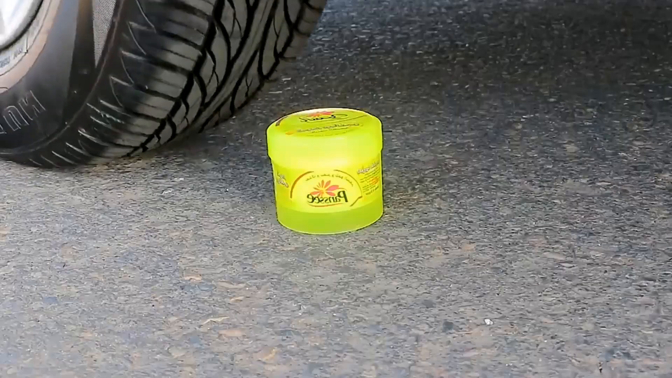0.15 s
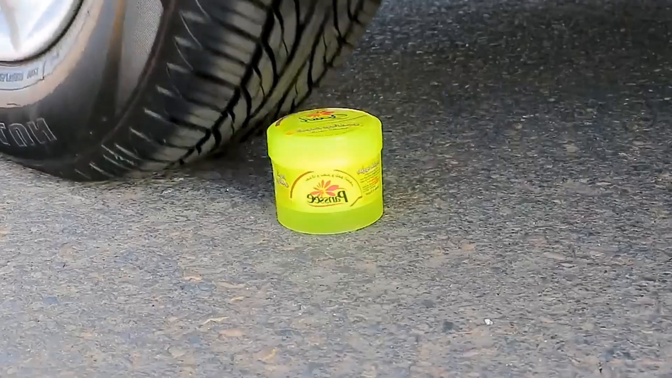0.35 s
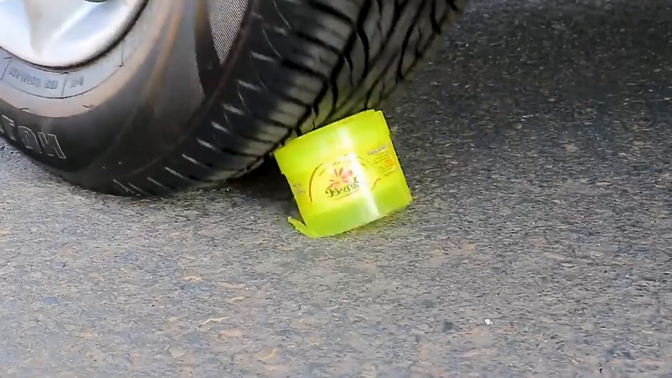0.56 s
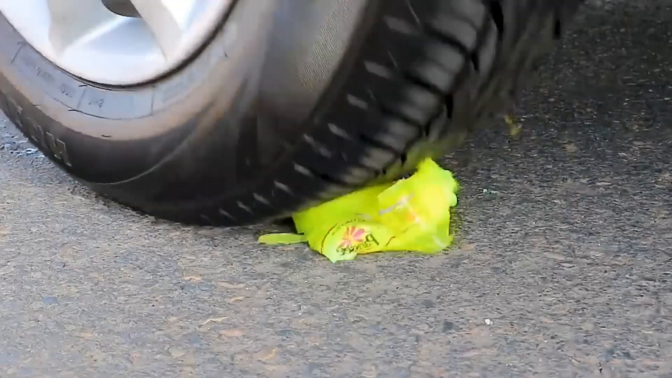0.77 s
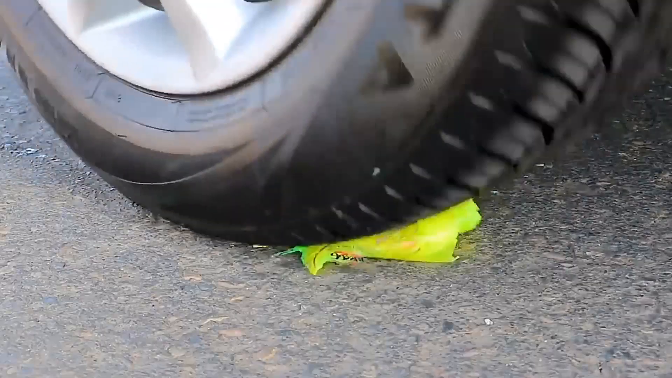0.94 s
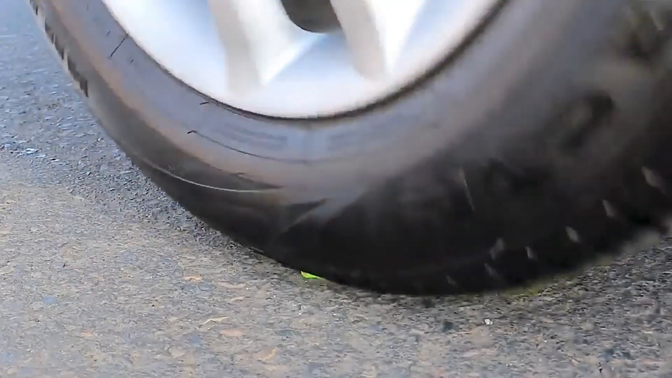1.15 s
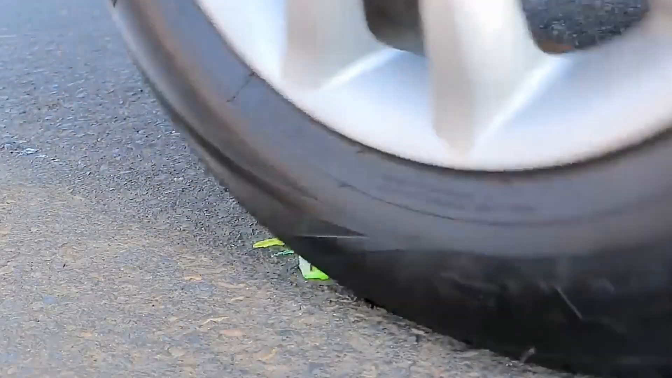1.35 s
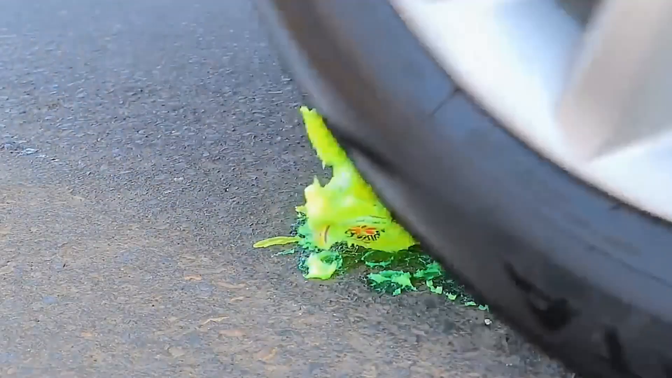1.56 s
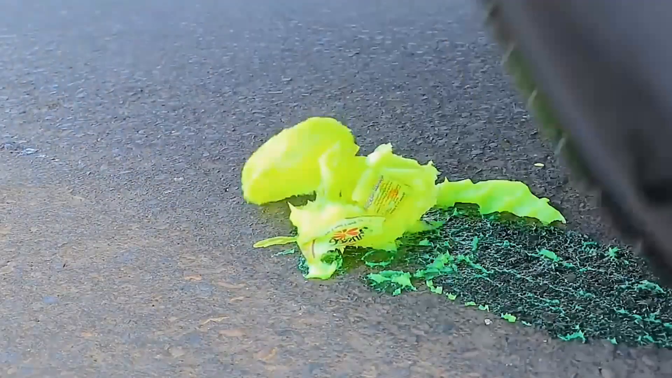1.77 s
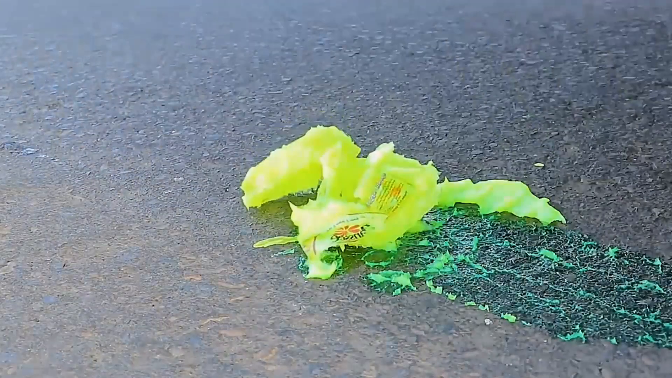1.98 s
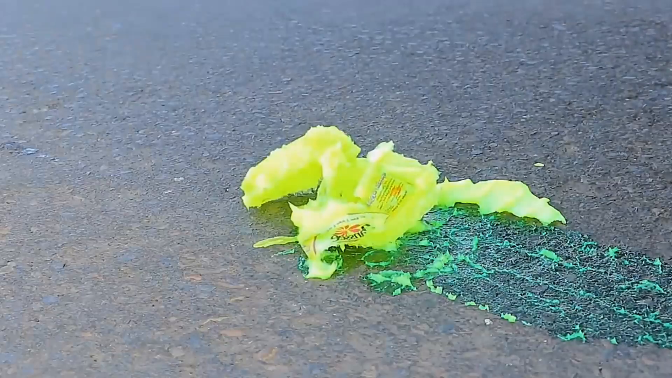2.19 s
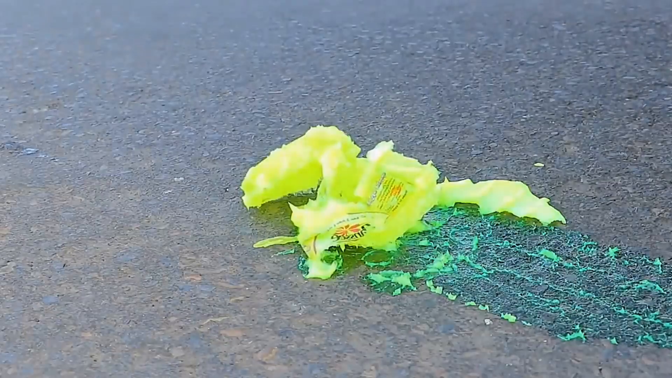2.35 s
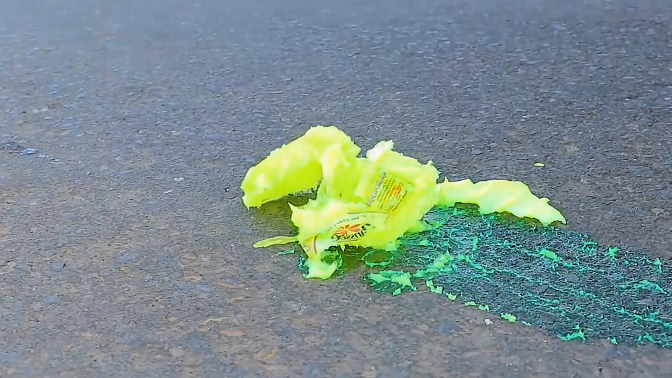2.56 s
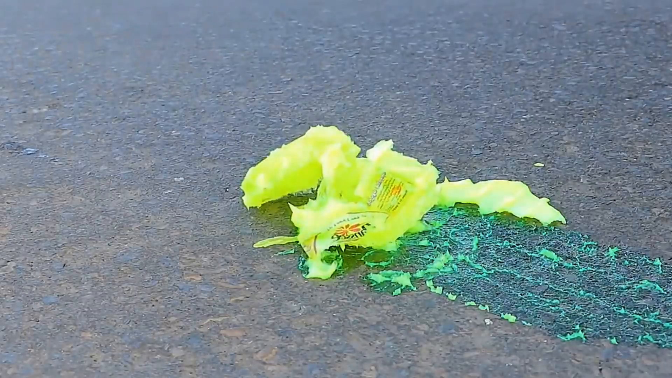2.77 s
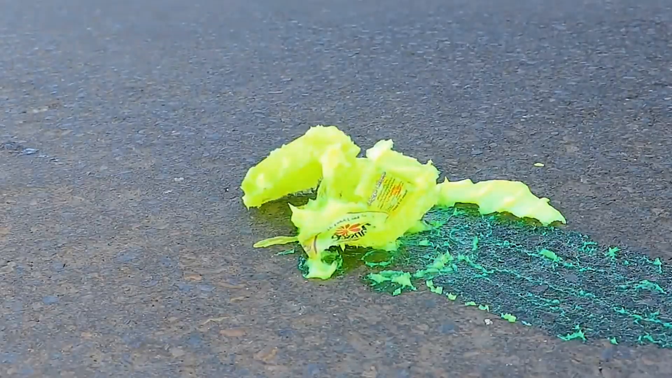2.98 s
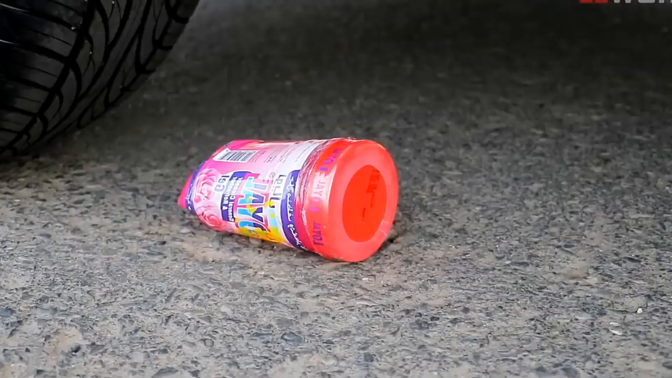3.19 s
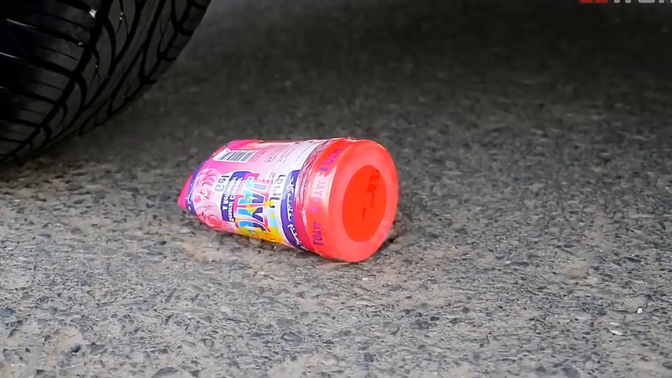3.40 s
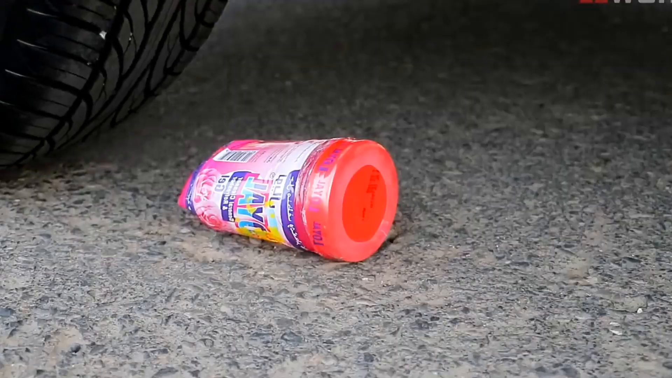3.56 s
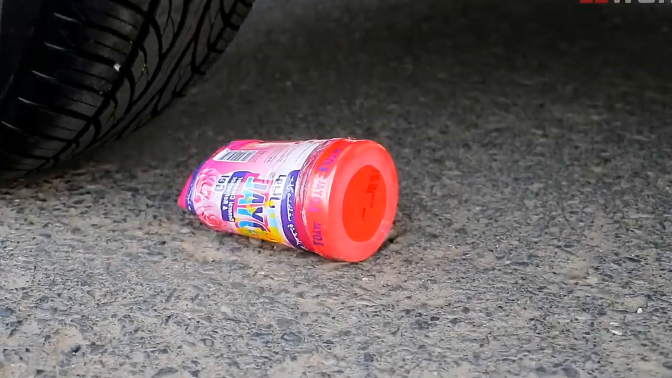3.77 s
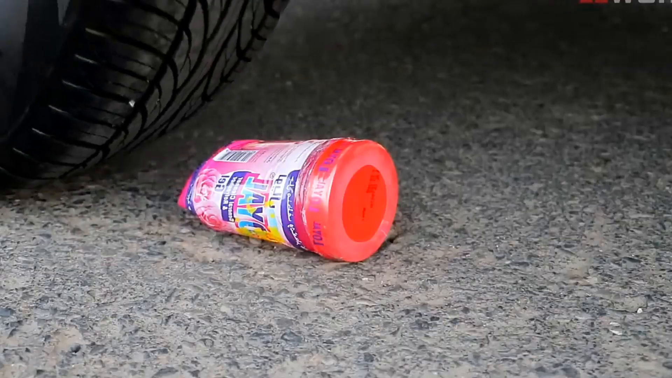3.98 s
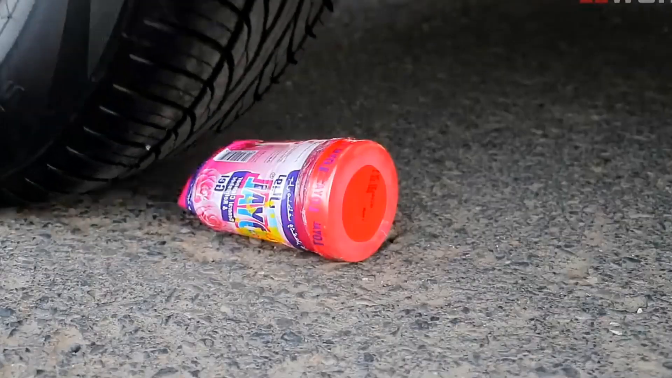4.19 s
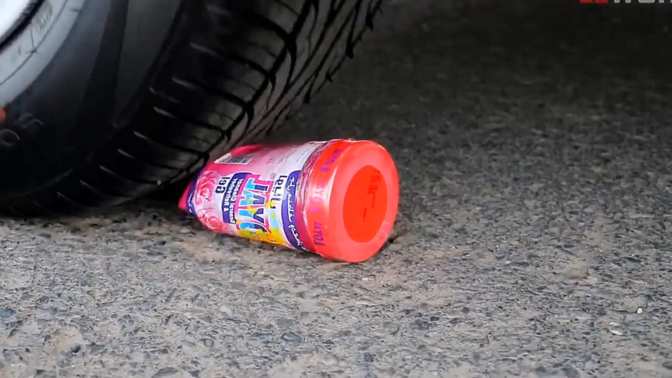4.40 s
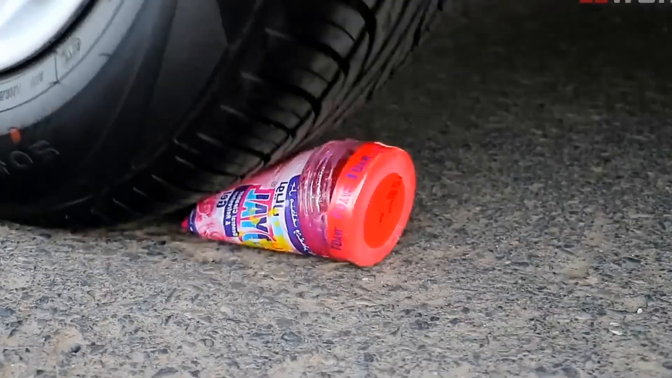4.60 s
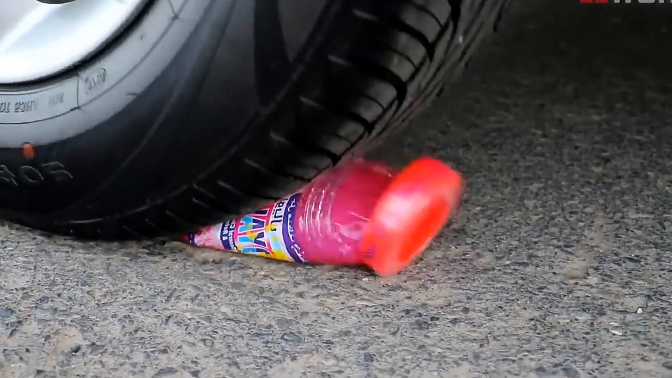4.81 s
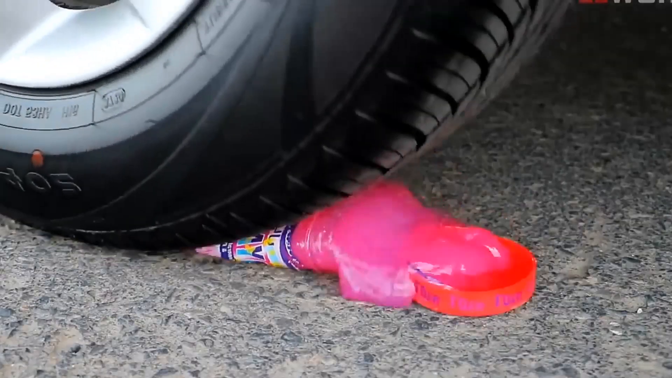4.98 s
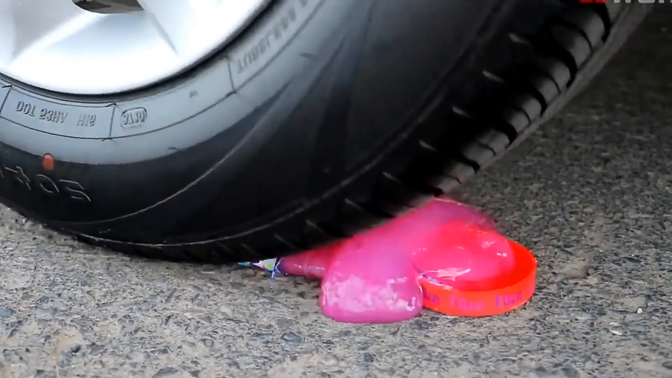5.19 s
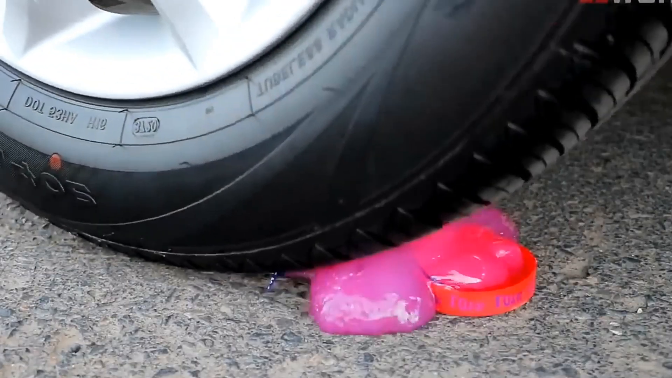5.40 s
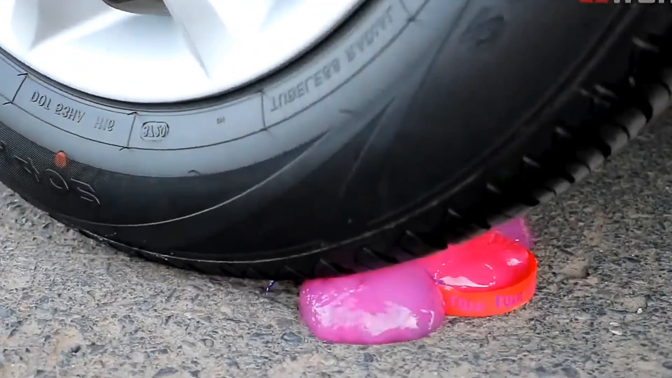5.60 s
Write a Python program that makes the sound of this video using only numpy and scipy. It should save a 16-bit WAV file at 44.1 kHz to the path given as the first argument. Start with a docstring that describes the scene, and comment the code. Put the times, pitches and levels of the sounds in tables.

```python
"""A tyre crushing a jar and a bottle

A car tyre creeps over a brittle plastic jar, then over a soft plastic bottle on asphalt. The jar
fractures in volleys of cracks that overload the microphone; the bottle buckles in small snaps.
Each is an impulse that excites damped resonances. Slime and splinters crackle under the tread,
while the exhaust pulses at idle, the engine rattles, the street hums and wind rumbles."""
import sys
import numpy as np
from scipy import signal
from scipy.fft import rfft, irfft
from scipy.io import wavfile

SR = 44100
rng = np.random.default_rng(int(sys.argv[2]) if len(sys.argv) > 2 else 0)


def output_pcm(signal):
    """Save a mono or channel-first signal as 16-bit PCM at the path in sys.argv[1].

    Samples are clipped to [-1, 1] before scaling.
    """
    pcm = np.clip(np.atleast_2d(signal).T, -1, 1) * 32767
    wavfile.write(sys.argv[1], SR, np.round(pcm).astype(np.int16))


N = 249165

# Jar fractures, bottle snaps, and ticks from the car between the two:
# t/s, peak level/dB, ring f/Hz, t60/s, treble re peak/dB
JAR_CRACKS = [(0.5234, -13.5, 4100, .007, -19), (0.6088, -20, 995, 0.0054, -23.5),
              (0.6144, 7.5, 766, .024, -3.5), (0.6273, 15, 5550, .025, -0.5), (0.632, 4, 5000, .047, -10),
              (0.6917, -10, 4330, .006, -1.5), (0.6949, 1.5, 4170, .02, -30.5),
              (0.7105, 7.5, 4830, .063, -10), (0.7219, 4.5, 1460, .02, 3), (0.7262, -6.5, 1500, .024, -8),
              (0.7345, 1, 3430, .024, -15), (0.7544, -15, 3524, .034, -1.5),
              (0.7728, -2.5, 1320, .013, -8.5), (0.7915, -0.5, 1500, .012, -3),
              (0.7956, 9, 3345, .008, -29.5), (0.8041, -2.5, 900, .04, -5), (0.8085, 9, 4750, .032, -6.5),
              (0.8344, -6.5, 1865, .007, -8), (0.8586, -5, 1120, .007, -16.5),
              (0.8647, -4, 1120, .019, -0.5), (0.8707, -3.5, 1900, .028, -9), (0.876, 4, 2340, .02, -7.5),
              (0.885, -2.5, 983, .026, -6), (0.8963, -3, 1140, .01, -20),
              (0.9137, -12.5, 2720, .0035, -6.5), (0.9389, -11.5, 2640, .017, 3.5),
              (0.9512, 4, 1050, .007, 0.5), (0.9621, 7.5, 1460, .009, -4), (0.9725, 2.5, 2000, .018, 2),
              (1.0254, -20.5, 3380, .007, -10), (1.0679, -21, 2430, .003, -8),
              (1.1105, -22, 4400, .003, -13), (1.1215, -21, 7000, .002, -6), (1.1296, -0.5, 3120, .006, -4),
              (1.1435, -26, 1000, .015, -14), (1.2083, -21, 1080, .013, -33),
              (1.2202, 4, 1750, 0.0062, -0.5), (1.2412, -28, 2300, .03, -13), (1.2845, -9, 3200, .006, -7),
              (1.2992, -15.5, 3170, .0046, -9), (1.3068, -17, 1000, .027, -24),
              (1.3871, -14, 3240, .002, -13), (1.4059, -23.5, 1870, .009, -29),
              (1.4204, -27, 1880, .012, -28), (1.4341, -18, 1680, .013, -34),
              (1.4674, -24, 2300, .034, -20), (1.4818, -12.5, 720, .034, -35),
              (1.5179, -16, 1610, .003, -25), (1.5224, -28, 2370, .016, -20),
              (1.5685, -42.5, 8100, 0.0055, -4), (1.5908, -34, 2690, .014, -9)]
BOTTLE_SNAPS = [(4.4631, -24, 4860, 0.0097, -18), (4.4847, -22, 3700, 0.0073, 3),
                (4.4963, -22, 3020, 0.0033, -12), (4.5234, -17.5, 4930, .011, -12),
                (4.5347, -17.5, 690, 0.024, -9), (4.5633, -12.5, 5000, .008, -34),
                (4.573, -5.5, 1080, 0.02, -3.5), (4.5771, -15.5, 2080, 0.036, -1.5),
                (4.6035, -25, 1080, .017, -10), (4.6171, -14.5, 5150, 0.015, -8),
                (4.6385, -18.5, 2330, 0.012, -7), (4.6701, -16, 3440, 0.0054, -30),
                (4.736, -18, 3700, 0.0084, -8), (4.771, -14.5, 3680, 0.0067, -14),
                (4.8028, -13, 5540, 0.0031, -4), (4.8177, -22, 2910, 0.021, -22),
                (4.8352, -23, 7500, 0.0073, 4), (4.8479, -27, 3670, 0.0033, 9.5),
                (4.8735, -26, 990, 0.015, 1), (4.9048, -25, 3700, 0.0062, 4), (4.9326, -13, 4930, 0.015, 6),
                (4.9566, -40, 3900, .006, -9), (4.9753, -10, 4500, .005, -12),
                (4.9857, -15, 4820, .006, -17), (4.9991, 1.5, 1690, 0.005, -36),
                (5.0029, -12, 1760, 0.014, -24), (5.029, -17, 1080, 0.014, -8),
                (5.0455, -25, 4500, .017, -6), (5.0502, -11, 4600, .018, -3),
                (5.0845, -15, 2650, 0.016, -5), (5.0882, -6.5, 4730, 0.0046, -14),
                (5.12, -20.5, 940, .007, -23), (5.136, -23.5, 3760, 0.12, -25),
                (5.1719, -19, 2370, .027, -3), (5.1976, -25, 2130, .01, -18),
                (5.2109, -12, 4240, 0.005, -13), (5.2177, -18.5, 2280, 0.0093, -12),
                (5.2355, -16.5, 4800, 0.031, -15), (5.2535, -15.5, 1250, 0.011, -2),
                (5.2658, -19.5, 1290, .0034, -2), (5.2819, -19.5, 5000, 0.0044, -15),
                (5.3066, -30, 2430, .012, -20), (5.323, -13.5, 720, 0.0086, -24),
                (5.3265, -16.5, 820, 0.033, -17), (5.3811, -17.5, 1940, .012, -14),
                (5.416, -26, 4130, .009, -6), (5.4632, -6, 774, 0.016, -31), (5.5025, -25, 975, .043, -10),
                (5.5766, -30, 1210, 0.0095, -12)]
CAR_TICKS = [(2.423, -38.5, 1760, 0.19, -45), (3.12, -50.5, 6320, .12, -25.5),
             (3.198, -32, 2350, .014, -16)]
# Resonances of the two containers and the exhaust pipe: f/Hz, bandwidth/Hz, gain/dB
JAR_BODY = [(592, 200, 5), (920, 330, 6), (1260, 1700, -2)]
BOTTLE_BODY = [(720, 114, 19), (1080, 230, 13.5), (1880, 850, 9)]
PIPE_MODES = [(22.1, 15, -1.5), (64, 27, -4.5), (104, 40, -8), (292, 110, -7)]
# Exhaust at idle: t/s, firing rate/Hz, level/dB
IDLE = [(0, 20.5, -59.5), (0.5, 21, -63.5), (1.42, 20.8, -58.5), (2.02, 22.8, -53.5), (2.64, 21.3, -53),
        (2.97, 18.2, -57.5), (3.15, 22.5, -62.5), (5.65, 21, -60)]
# Street and engine bay: t/s, hum level/dB, rattle level/dB
BACKGROUND_LEVELS = [(0, -58, -61), (0.5, -51, -60), (1.0, -43, -54), (1.3, -46.5, -47),
                     (1.55, -51.5, -46.5), (1.75, -51, -60), (2.2, -55.5, -62.5), (2.6, -56.5, -61),
                     (2.95, -58, -67.5), (3.15, -64.5, -66), (3.3, -49.5, -55.5), (3.45, -49.5, -56.5),
                     (4.3, -51, -58), (4.6, -50, -61), (5.3, -50, -45.5), (5.65, -49, -57.5)]
# Spectra of the hum and the rattle: f/Hz, relative spectral level/dB
HUM_SPECTRUM = [(65, -33), (110, 2), (199, -8), (312, -1), (361, -6), (423, -2.5), (730, -2), (2000, -14.5),
                (2600, -43.5), (4400, -120)]
RATTLE_SPECTRUM = [(710, -31.5), (1200, -1), (1910, -12.5), (2180, 0.5), (2760, -7.5), (3590, -7.5),
                   (9410, -25.5), (10800, -36), (14800, -32.5), (16000, -52.5)]
# Tones in the engine rattle: f/Hz, bandwidth/Hz, level re rattle/dB
WHINE_TONES = [(1020, 150, -3), (1570, 40, -21), (2130, 35, -11)]
# Splinters and slime under the tread, one curve per container: t/s, level/dB
CRACKLE_LEVELS = [
    [(0.6, -46), (0.63, -38), (0.68, -43), (0.75, -28), (1.0, -60), (1.15, -55), (1.25, -57), (1.35, -71),
     (1.5, -68), (1.69, -52), (1.72, -70)],
    [(4.44, -60.5), (4.5, -46.5), (4.6, -41.5), (4.9, -43), (5.05, -38.5), (5.12, -48), (5.28, -45.5),
     (5.4, -53), (5.65, -61)],
]
# Walls giving way under the load: t/s, peak level/dB, f/Hz, t60/s
COLLAPSES = [(0.616, -31.5, 89, 0.52), (0.628, -20, 192, 0.38), (0.692, -11, 180, 0.33),
             (0.715, -29, 90, 0.23), (0.772, -13.5, 166.9, 0.12), (0.806, -19, 176.7, 0.11),
             (0.861, -23, 114.5, 0.2), (0.973, -7.5, 365, 0.088), (0.977, -29.5, 144, 0.37),
             (1.219, -26.5, 128, 0.23), (1.221, -18, 420, 0.05), (1.305, -34, 146, 0.11),
             (4.534, -21, 174, 0.073), (4.572, -20.5, 244, 0.14), (5.323, -33, 266, 0.095)]
# Air in the tyre, set humming by the shocks: t/s, f/Hz, level/dB
CAVITY_TONE = [(0.82, 197.4, -68.5), (0.88, 212, -43), (1.0, 199.5, -42.5), (1.15, 199.5, -50),
               (1.22, 203, -59)]
# Faint hiss as the car draws away: t/s, centre f/Hz, level/dB
HISS_GLIDE = [(2.42, 3900, -78), (2.55, 4150, -69), (2.9, 4700, -72), (3.0, 4750, -85)]
# Gusts on the microphone: t/s, level/dB
GUST_LEVELS = [(3.15, -72), (3.3, -56), (3.8, -56), (4.1, -62.5), (4.45, -48.5), (5.0, -58), (5.65, -45.5)]

# Coupling of a crack to body and mids, re its peak: body level at 2 kHz and t60 = 15 ms/dB,
# change per octave/dB, change per doubling of t60/dB, mids level/dB, mids dB per treble dB
JAR_COUPLING = (-7.5, -3.5, 2.5, -1.5, 0.4)
BOTTLE_COUPLING = (-11.5, -3.5, 0, -3, 0.54)
TICK_COUPLING = (-22, -10.5, 5, -12, 6)


def from_db(db):
    """Amplitude ratio of a level."""
    return 10 ** (np.asarray(db) / 20)


def unit_rms(x):
    """The signal scaled to an rms of 1."""
    return x / np.sqrt(np.mean(x ** 2) + 1e-20)


def in_time(rows):
    """Columns of a curve interpolated at every sample; -120 outside its span."""
    times, *columns = np.transpose(rows)
    return [np.interp(np.arange(N) / SR, times, c, left=-120, right=-120) for c in columns]


def butter(x, hz, kind, order=2):
    """Butterworth filter."""
    return signal.sosfilt(signal.butter(order, hz, kind, fs=SR, output="sos"), x)


def drift(hz):
    """Slow random fluctuation: low-passed noise of rms 1."""
    r = np.exp(-2 * np.pi * hz / SR)
    return unit_rms(signal.lfilter([1], [1, -2 * r, r * r], rng.standard_normal(N + SR))[SR:])


def resonate(x, hz, *widths_hz):
    """Damped resonators in series, one per bandwidth, each of unit peak gain."""
    for width in widths_hz:
        r = np.exp(-np.pi * width / SR)
        feedback = [1, -2 * r * np.cos(2 * np.pi * hz / SR), r * r]
        x = signal.lfilter(np.array([1, 0, -1]) * (1 - r * r) / 2, feedback, x)
    return x


def glide(hz):
    """A sine whose phase is the integral of its frequency."""
    return np.sin(2 * np.pi * np.cumsum(np.maximum(hz, 0)) / SR)


def coloured(spectrum, waver_db):
    """Spectrally shaped noise of rms 1 with a wavering level."""
    bins_hz = np.maximum(np.arange(N // 2 + 1) * SR / N, 1)
    hz, db = np.transpose(spectrum)
    shape = from_db(np.interp(np.log(bins_hz), np.log(hz), db))
    noise = irfft(rfft(rng.standard_normal(N)) * shape, N)
    return unit_rms(noise * from_db(waver_db * drift(15)))


def exhaust():
    """Pipe resonance, driven by a suction pulse per firing and a weaker pressure pulse in between."""
    firing_hz, level_db = in_time(IDLE)
    half_cycles = np.floor(2 * np.cumsum(np.maximum(firing_hz, 0)) / SR + 0.6)
    pulses = np.diff(half_cycles, prepend=0) * np.where(half_cycles % 2, .65, -1)
    puffs = butter(pulses * from_db(1.2 * rng.standard_normal(N)), 240, "low")
    pipe = sum(from_db(db) * resonate(puffs, hz, width) for hz, width, db in PIPE_MODES)
    return from_db(level_db) * unit_rms(pipe + 0.37 * puffs)


def street_hum():
    """Broadband noise with its energy mostly at low frequencies."""
    hum_db, _ = in_time(BACKGROUND_LEVELS)
    return from_db(hum_db) * coloured(HUM_SPECTRUM, waver_db=1.2)


def engine_rattle():
    """Bright broadband noise, with narrow noise-driven resonances heard as a whine."""
    _, rattle_db = in_time(BACKGROUND_LEVELS)
    white = rng.standard_normal(N)
    whine = sum(from_db(db + 2.5 * drift(3)) * unit_rms(resonate(white, hz, width, width))
                for hz, width, db in WHINE_TONES)
    return from_db(rattle_db) * (coloured(RATTLE_SPECTRUM, waver_db=1.0) + whine)


def cracks(events, body_modes, coupling):
    """Impulse excitation: a fracture or snap, a decaying noise, rings the piece and the whole body."""
    base_db, db_per_octave, db_per_doubling, mids_db, mids_follow = coupling
    out, size = np.zeros(N), SR // 6
    t = np.arange(size) / SR
    for start, peak_db, hz, t60, treble_db in events:
        decay = from_db(-60 * t / t60)
        burst = rng.standard_normal(size) * decay + 1e-18
        burst[0] += 3.5  # the first snap is the sharpest
        piece = resonate(burst, hz, 0.33 * hz, 2.0 * hz)
        # Each crack weights the modes differently; neighbouring modes alternate in sign.
        modes = sum(from_db(db + rng.normal(0, 2)) * (-1) ** k * resonate(burst, mode_hz, width)
                    for k, (mode_hz, width, db) in enumerate(body_modes))
        body = butter(modes, 1900, "low")
        # Large, low-pitched pieces and long fractures move the body more.
        body_db = base_db + db_per_octave * np.log2(hz / 2000) + db_per_doubling * np.log2(t60 / .015)
        treble = butter(burst * decay ** 1.1, [5500, 15000], "band", order=1)
        mids = butter(burst, [1500, 5000], "band", order=3)
        parts = [(piece, 0), (body, body_db), (treble, treble_db),
                 (mids, mids_db + mids_follow * treble_db)]
        sound = sum(from_db(db) * part / np.abs(part).max() for part, db in parts)
        at = round(start * SR)
        out[at:at + size] += from_db(peak_db) * sound[:N - at]
    return out


def scatter(x, level_db=-18, t60=.1):
    """Multiple reflection between road and car floor adds a short diffuse tail."""
    t = np.arange(SR // 4) / SR
    tail = butter(rng.standard_normal(len(t)), [700, 5000], "band", order=1) * from_db(-60 * t / t60)
    return from_db(level_db) * signal.fftconvolve(x, tail / np.sqrt(np.sum(tail ** 2)))[:N]


def crackle(level_db, median_per_s=3200):
    """Shot noise: splinters and slime click in random clusters, each click ringing a few cycles."""
    sizes = from_db(3.8 * np.minimum(rng.exponential(1, N), 4)) * rng.choice([-1, 1], N)
    onsets = rng.random(N) < median_per_s * from_db(5 * drift(40)) / SR
    band = rng.integers(0, 14, N)
    rings = np.zeros(N)
    for k, hz in enumerate(np.geomspace(1000, 13000, 14)):
        clicks = sizes * onsets * (band == k) + 1e-18
        rings += resonate(clicks, hz, .25 * hz, .6 * hz) / (1 + (hz / 4200) ** 1.8)
    return from_db(level_db) * unit_rms(rings)


def crinkle(level_db, per_s=90, t60=.008):
    """A sparse Poisson process: larger folds snap, each a decaying band of noise."""
    onsets = (rng.random(N) < per_s / SR) * from_db(4.0 * rng.standard_normal(N))
    band, white = rng.integers(0, 8, N), rng.standard_normal(N)
    decay_per_sample = from_db(-60 / (t60 * SR))
    snaps = np.zeros(N)
    for k, hz in enumerate(np.geomspace(1400, 8000, 8)):
        envelope = signal.lfilter([1], [1, -decay_per_sample], onsets * (band == k) + 1e-18)
        snaps += resonate(white * envelope, hz, .4 * hz, 1.5 * hz)
    return from_db(level_db) * unit_rms(snaps)


def thumps():
    """Damped vibration: each collapse excites a low resonance, broadened by the pressing rubber."""
    out, t = np.zeros(N), np.arange(SR // 3) / SR
    for start, peak_db, hz, t60 in COLLAPSES:
        push = rng.standard_normal(len(t)) * from_db(-60 * t / t60)
        push[0] += 15.0
        ring = resonate(push, hz, 0.54 * hz, 2.0 * hz)
        at = round(start * SR)
        out[at:at + len(t)] += (from_db(peak_db) * ring / np.abs(ring).max())[:N - at]
    return out


def tyre_cavity():
    """Cavity resonance: the air in the tyre sounds one slightly unsteady tone."""
    hz, level_db = in_time(CAVITY_TONE)
    return np.sqrt(2) * from_db(level_db + 0.5 * drift(60)) * glide(hz)


def creak(start_s=1.177, end_s=1.206, slips_per_s=190, level_db=-30, hz=3300):
    """Stick-slip friction: a shard on the tread slips at an even pace and rings at each slip."""
    slips = np.zeros(N)
    at = (np.arange(start_s, end_s, 1 / slips_per_s) * SR).astype(int)
    slips[at] = from_db(level_db + rng.normal(0, 1.5, len(at)))
    ring = butter(resonate(slips + 1e-18, hz, 2500, 2500), 5500, "low", order=3)
    return ring * slips.max() / np.abs(ring).max()


def rising_hiss():
    """Modulation: low-passed noise on a rising carrier gives a narrow, gliding band."""
    hz, level_db = in_time(HISS_GLIDE)
    noise = unit_rms(butter(rng.standard_normal(N), 200, "low"))
    return from_db(level_db) * noise * glide(hz)


def wind():
    """Pressure fluctuation: gusts on the microphone make an uneven, very low rumble."""
    rumble = butter(rng.standard_normal(N), [14, 40], "band", order=3)
    gusts = unit_rms(rumble * from_db(4.7 * drift(3.9)))
    return from_db(in_time(GUST_LEVELS)[0]) * gusts


def scene():
    """Superposition of all sources in one channel; only the sharp sounds are scattered."""
    crackle_db = np.maximum(*[in_time(curve)[0] for curve in CRACKLE_LEVELS])
    sharp = (cracks(JAR_CRACKS, JAR_BODY, JAR_COUPLING)
             + cracks(BOTTLE_SNAPS, BOTTLE_BODY, BOTTLE_COUPLING)
             + cracks(CAR_TICKS, BOTTLE_BODY, TICK_COUPLING)
             + crackle(crackle_db) + crinkle(crackle_db - 5) + creak())
    foreground = sharp + scatter(sharp) + thumps() + tyre_cavity()
    background = exhaust() + wind() + engine_rattle() + street_hum() + rising_hiss()
    return (foreground + background)[None]


def record(dry, ceiling=.68, self_noise_db=-84, stopband_hz=16600):
    """Saturation: the microphone flattens the loudest cracks, adds hiss and loses the top treble."""
    limited = dry / (1 + np.abs(dry / ceiling) ** 4) ** (1 / 4)
    noisy = limited + from_db(self_noise_db) * rng.standard_normal(N)
    rolled_off = butter(noisy, 21000, "low", order=8)
    return signal.sosfilt(signal.cheby2(18, 120, stopband_hz, fs=SR, output="sos"), rolled_off)


dry = scene()
out = record(dry)
output_pcm(out)
```